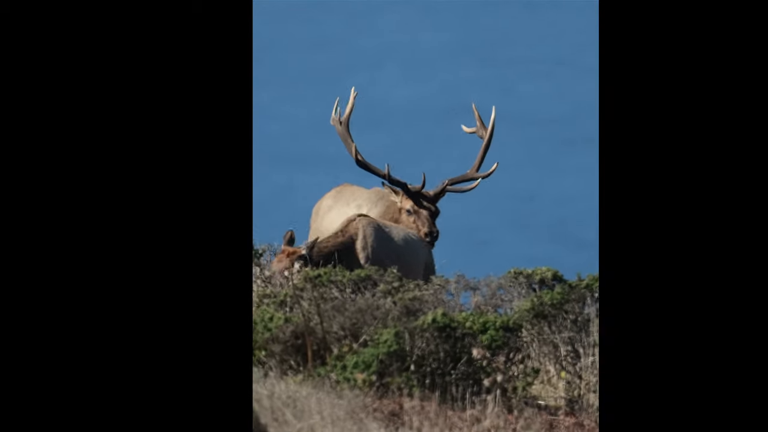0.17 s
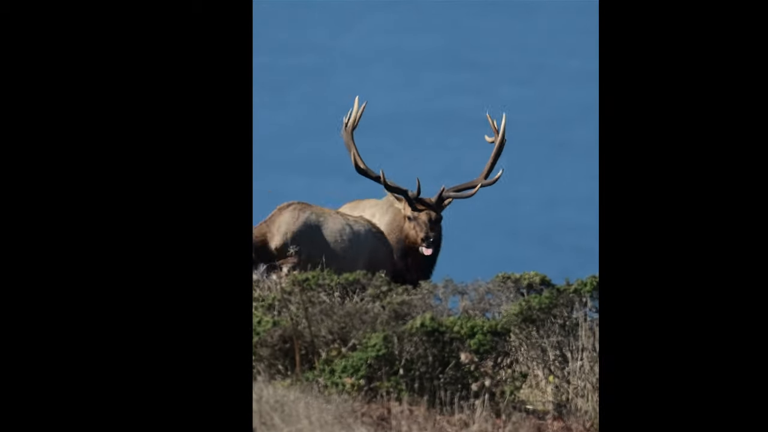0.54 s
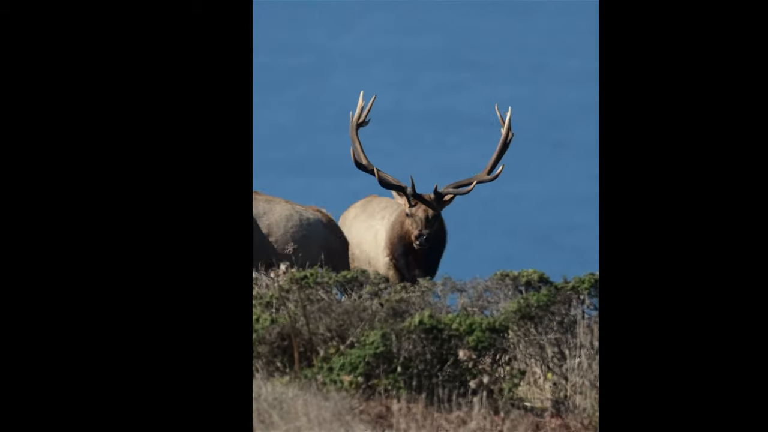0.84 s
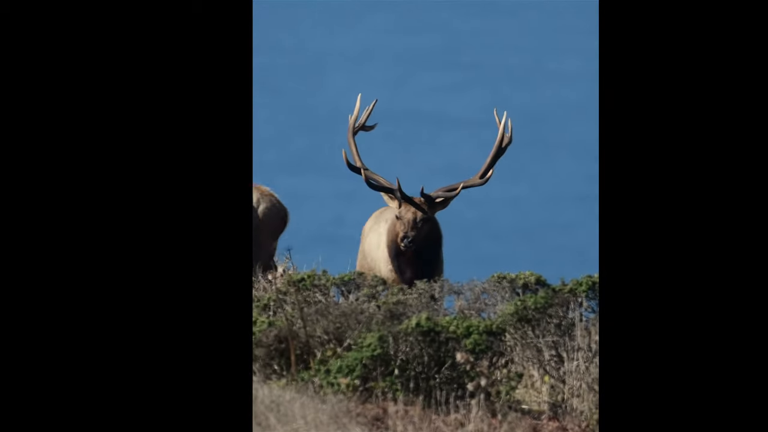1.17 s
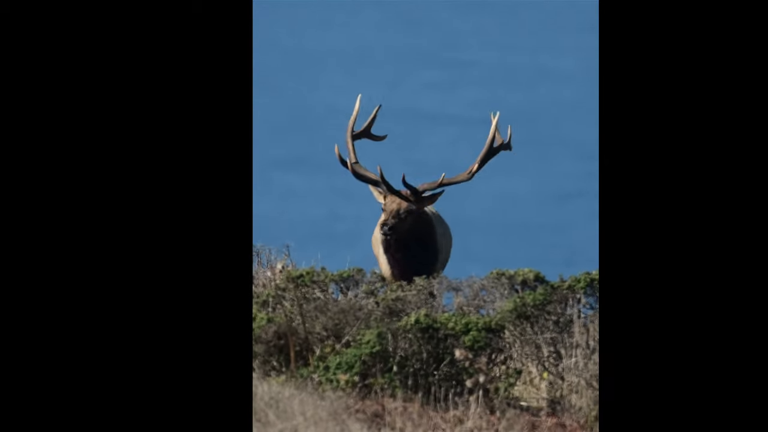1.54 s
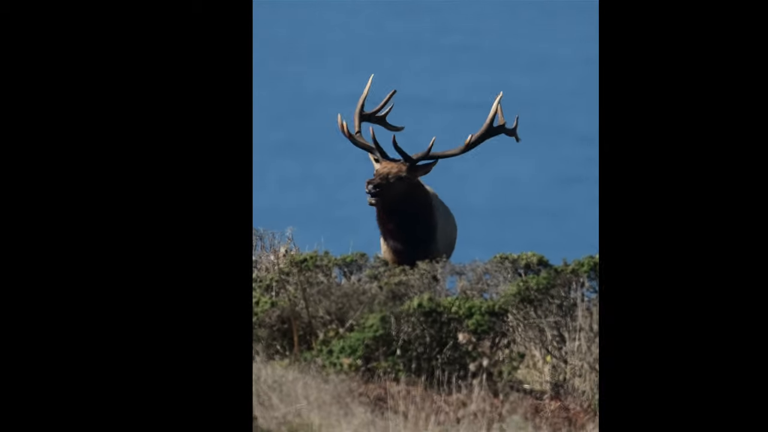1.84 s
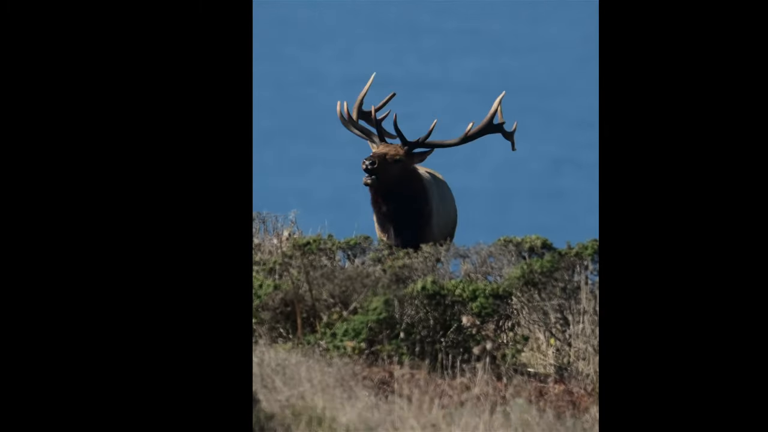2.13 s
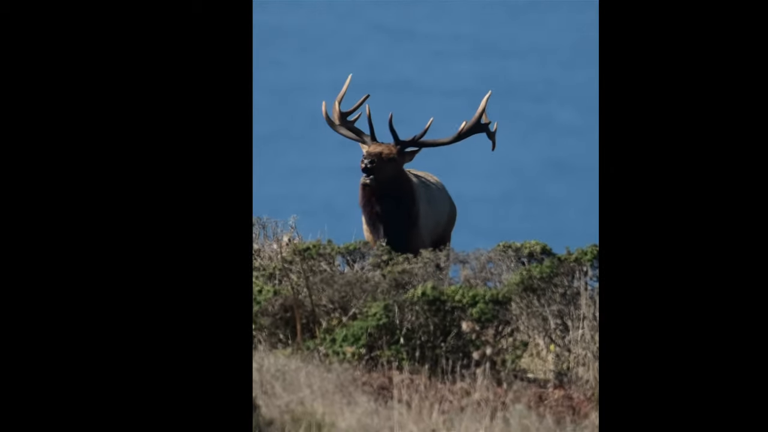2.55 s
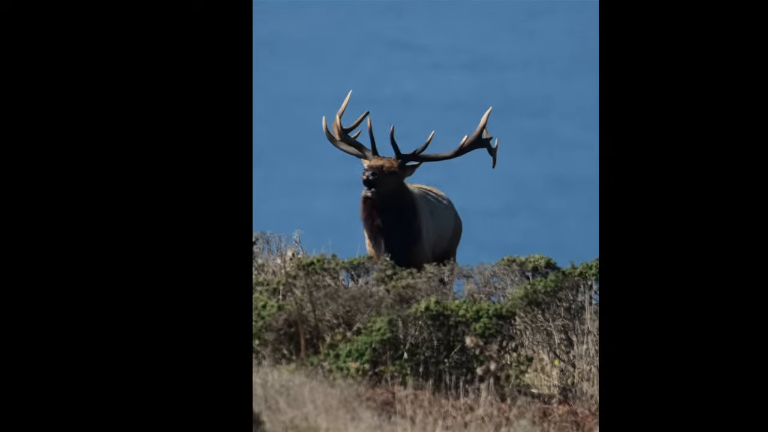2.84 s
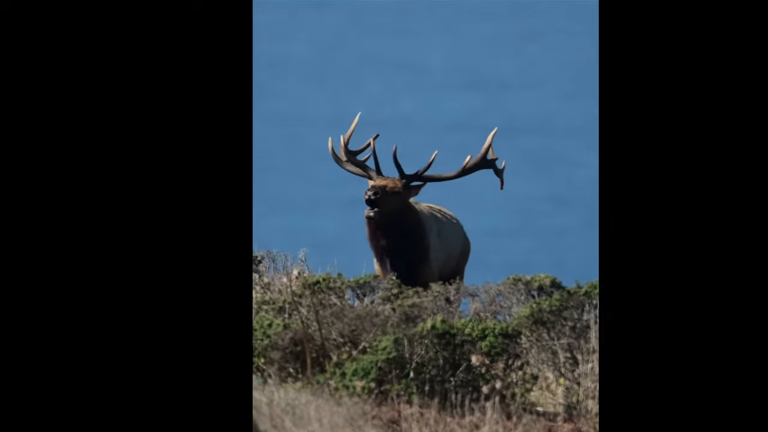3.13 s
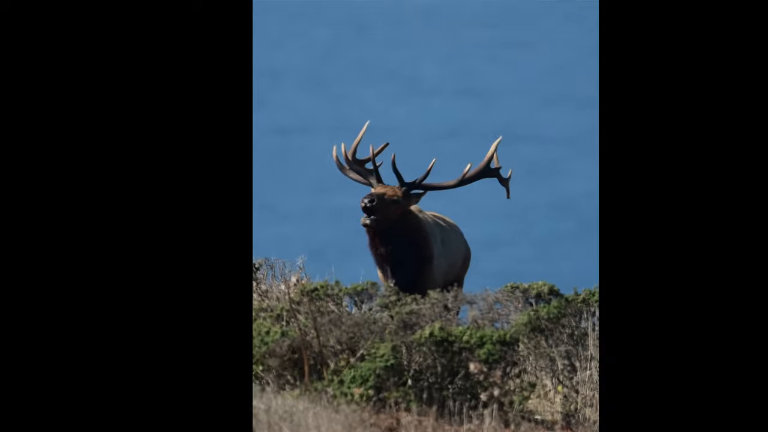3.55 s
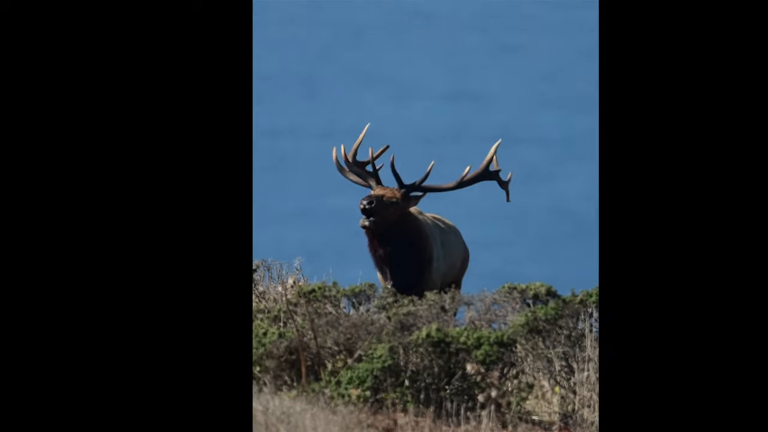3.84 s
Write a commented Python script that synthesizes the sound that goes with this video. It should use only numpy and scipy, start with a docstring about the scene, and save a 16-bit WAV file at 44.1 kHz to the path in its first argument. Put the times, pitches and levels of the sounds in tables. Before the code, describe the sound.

Steady wind and far surf fill an open coast, with light thumps on the microphone, two faint clicks and thin bird chirps. Then an elk gives a loud bugle that rises quickly and holds a shrill, rasping whistle.

```python
"""Wind and far surf rush over coastal scrub, with faint hums and the hiss of a camera's electronics.
In the first second gusts thump the microphone and a small bird chips. Then the camera ticks twice.
After two seconds the gusts and chips return. Near 2.7 s a bull elk bugles: its whistle climbs in steps,
then holds from 3.1 s to the end while the vocal folds buzz under it and split each harmonic into
sidebands (extra tones just above and below it)."""
import sys
import numpy as np
from scipy import signal
from scipy.fft import rfft, irfft, next_fast_len
from scipy.io import wavfile
from scipy.ndimage import uniform_filter1d, map_coordinates

SR = 44100
rng = np.random.default_rng(int(sys.argv[2]) if len(sys.argv) > 2 else 0)


def pcm_store(signal):
    """Save signal as 16-bit PCM."""
    levels = np.round(np.clip(np.atleast_2d(signal), -1, 1) * 32767)
    wavfile.write(sys.argv[1], SR, levels.astype(np.int16).T)


N = 176400
TIME_S = np.arange(N) / SR

# Tone colour of the wind and surf: pitch_hz, gain_db
RUSH_COLOUR = [(15, -46), (25, -19), (49, -4), (169, -6), (272, -4.5), (305, -11), (541, -9.5),
               (595, -13.5), (1020, -12.5), (1490, -23.5), (1910, -24.5), (2400, -30.5), (3120, -82)]
# How much of the rush differs between the ears, against what they share: pitch_hz, width_db
RUSH_WIDTH = [(200, -44.5), (380, -18.5), (700, -11.5), (1290, 0.5), (2400, 10)]
# Rise and fall of the gusts on the microphone: time_s, relative_level_db
GUST_LEVELS = [(0, -53.5), (.3, -50), (.7, -59), (.85, -52), (1.3, -67.5), (2.2, -58.5), (2.35, -47.5),
               (2.5, -56), (2.66, -48), (2.8, -54), (3.4, -57), (3.55, -84)]
# Tone colour of the gusts: pitch_hz, gain_db
GUST_COLOUR = [(30, -6), (60, -7), (120, -1.5), (200, -12), (320, -13), (500, -62)]
# Steady hums: pitch_hz, width_hz, level_db
HUM_TONES = [(1899.6, 63.4, -75.5), (181.6, 4.1, -66.5), (490.3, 17, -73), (569.6, 110, -66)]
# Tone colour of the electronic hiss: pitch_hz, gain_db
HISS_COLOUR = [(1500, -26), (2800, -1), (4000, 1.5), (6200, -0.5), (7200, -3.5), (9000, -3.5), (15700, -9)]
# Single thumps of wind: start_s, relative_level_db, pitch_hz
WIND_THUMPS = [(0.184, -38, 93), (0.207, -40, 114), (0.239, -37, 126), (0.628, -39, 117),
               (0.839, -41.5, 100), (0.428, -29, 170), (0.808, -33, 99), (0.995, -40, 148),
               (2.315, -32.5, 93), (2.392, -33, 117.8), (2.59, -35, 162.6), (2.669, -37, 81.6),
               (3.099, -40, 94.2)]
# Bird chips: start_s, length_s, start_pitch_hz, end_pitch_hz, level_db, left_over_right_db
BIRD_CHIPS = [(2.24, 0.06, 9700, 7560, -58, -17), (2.7, 0.06, 10600, 8750, -65.5, -4),
              (2.1, .045, 8800, 7700, -72, -10), (2.51, 0.034, 8400, 7990, -66, 3),
              (0.476, 0.042, 7100, 6340, -66.5, -12)]
# Camera ticks: start_s, relative_level_db, ring_hz, treble_limit_hz
CAMERA_TICKS = [(1.2575, -43, 1900, 8000), (1.7912, -45, 4000, 4500)]
# The elk's hoarse breath: time_s, level_db
BREATH_LEVELS = [(2.6, -100), (2.78, -74), (2.9, -68), (2.96, -59), (3.03, -66), (3.12, -76)]
# Bands where the throat boosts the breath: pitch_hz, width_hz, gain_db
THROAT_BANDS = [(3750, 260, 5), (5800, 1400, -15)]
# The climbing whistle: time_s, pitch_hz, then level_db for each of harmonics 1 to 4
WHISTLE_CLIMB = [(2.73, 749, -59.5, -68, -63, -85), (2.775, 775, -55.5, -82, -79, -87),
                 (2.803, 795, -77, -74, -80, -85), (2.808, 1025, -54.5, -61, -83.5, -86),
                 (2.85, 1077, -48.5, -70, -71.5, -69), (2.882, 1073, -48, -60, -74, -60.5),
                 (2.888, 1136, -48, -69, -72, -69), (2.918, 1202, -48.5, -65, -57, -77),
                 (2.928, 1453, -46.5, -67.5, -53, -68), (2.95, 1473, -46.5, -65, -55, -64),
                 (2.972, 1467, -45.5, -82, -58, -63), (2.978, 1625, -52.5, -68, -58, -56),
                 (2.995, 1710, -44, -75, -56, -57.5), (3.008, 1720, -43.5, -61, -59.5, -55),
                 (3.019, 1846, -50, -38.5, -54.5, -57), (3.035, 1910, -55, -39.5, -60, -82),
                 (3.055, 1990, -47, -35.5, -65, -90), (3.075, 2020, -54, -36, -50.5, -62),
                 (3.1, 2077, -47.5, -40.5, -39.5, -60), (3.108, 2112, -38.5, -35.5, -43.5, -83)]
# Roughness of the voice: time_s, roughness (0 to 1)
VOICE_ROUGHNESS = [(2.99, .2), (3.05, .07), (3.25, .08), (3.45, .2), (3.62, .15), (3.632, .36), (3.728, .3),
                   (3.74, .1)]
# The held whistle: time_s, pitch_hz, folds_hz, then level_db, centre, spread for harmonics 1 to 3.
# Centre and spread count sidebands and say which are strong. Harmonic 1 has its centre in the next table.
WHISTLE_HOLD = [(3.125, 2250, 273.3, -52.5, 1.05, -40, 0.1, 0.6, -46, 0.79, 1.21),
                (3.15, 2277, 260, -52, 0.95, -49, -0.64, 1.1, -39, 0, 0.78),
                (3.2, 2296, 239.6, -46, 0.95, -56, -0.25, 1.18, -33.5, -0.36, 0.66),
                (3.26, 2286, 239.5, -40.5, 0.848, -57, 1.06, 2.6, -39.5, -0.4, 1.04),
                (3.3, 2290, 225.4, -41.5, 1.03, -50, -0.1, 1.3, -44.5, -1.05, 0.82),
                (3.34, 2287, 225, -42, 1.22, -52, 1.4, 3.1, -59, -2.53, 2.6),
                (3.4, 2291, 212.5, -39, 1.246, -56.5, 1, 3, -51.5, 0.49, 2.9),
                (3.53, 2313, 203, -41.5, 1.44, -61, 1, 3.4, -53, -1.9, 2.3),
                (3.61, 2304, 211.2, -40.5, 1.353, -55.5, 1.3, 3.53, -50, -1.9, 2.8),
                (3.64, 2328, 210.7, -42.5, 1.4, -59.5, 1.5, 4.4, -53.5, -0.36, 3.1),
                (3.72, 2331, 208, -41.5, 1.3, -60, 2.7, 4.5, -51.5, -1, 2.4),
                (3.75, 2307, 202.6, -37.5, 1.304, -62, 1, 3.55, -50.5, 0.12, 2.8),
                (3.82, 2294, 203.7, -37.5, 1.29, -53, 0.5, 2.39, -44.5, 0.027, 1.86),
                (3.9, 2299, 200.4, -39, 1.3, -50.5, 0.8, 2.35, -46.5, -0.5, 1.6),
                (3.975, 2300, 200.7, -41.5, 1.27, -52, 0.29, 2.3, -48, -0.67, 1.35)]
# Centre of the sidebands around harmonic 1: time_s, centre (in sidebands)
FIRST_HARMONIC_CENTRE = [(3.15, 0.16), (3.36, -.3)]
# Steady colour of the hold, one row for each of harmonics 1 to 3: gain_db for sidebands -4 to 4
SIDEBAND_GAINS = [
    [5, 20, -15, 5.1, -1, 3.2, 5, -17, -40],
    [1.6, 5, 6.5, 3.2, -5.5, 3.6, -1, -1, 2.5],
    [2.2, 0.5, 2, 0.87, 1.5, 0.91, -7, -27, -45],
]
# Faint fourth harmonic of the hold: time_s, level_db
FOURTH_HARMONIC = [(3.13, -77), (3.16, -63), (3.22, -61.5), (3.33, -78.5)]
# The elk in the left ear against the right: pitch_hz, left_over_right_db, left_lead_rad
ELK_DIRECTION = [(1070, -3.5, 0), (1470, -9, 0), (2100, -12.5, .65), (2300, -6.5, .68), (2500, -4.7, .5),
                 (4400, -11, 0), (4800, -6, -.15), (6900, -8.5, .1)]
# Bands that the camera housing cancels: pitch_hz, width_hz
HOUSING_DIPS = [(2620, 286), (7750, 1080)]

LEAN_HZ = 2208  # the rush and hums lean right with pitch; their lean_db applies at this pitch
CALL_START = int(2.6 * SR)  # the elk's tones are silent before this sample


def amp(db):
    """Turn decibels into a gain."""
    return 10 ** (np.asarray(db) / 20)


def unit(x):
    """Scale a sound to an average power of 1."""
    return x / np.sqrt(np.mean(x ** 2) + 1e-20)


def along(points, hz):
    """Read between (pitch_hz, value) points on a log pitch scale."""
    pitches, values = np.transpose(points)
    return np.interp(np.log(hz + 1), np.log(pitches + 1), values)


def curves(rows):
    """One value per sample for each column after the time."""
    times, *columns = np.transpose(rows)
    return [np.interp(TIME_S, times, column) for column in columns]


def wobble(rate_hz, size=N):
    """A smooth random curve through rate_hz points a second."""
    points = rng.standard_normal(int(size * rate_hz / SR) + 4)
    return map_coordinates(points, [np.arange(size) * rate_hz / SR])


def filtered(x, response):
    """Give each frequency f in x the gain response(f)."""
    size = next_fast_len(N + SR // 2)
    return irfft(rfft(x, size) * response(np.fft.rfftfreq(size, 1 / SR)), size)[..., :N]


def colour(points):
    """A filter that follows (pitch_hz, gain_db) points and is silent outside them."""
    return lambda f: amp(along(points, f)) * (f > points[0][0]) * (f < points[-1][0])


def band(f, hz, width_hz):
    """A soft hill of gain around hz."""
    return 1 / (1 + ((f - hz) / width_hz * 2) ** 2)


def resonance(f, hz, width_hz):
    """A filter that rings at hz, for longer the narrower it is."""
    return 1j * f * width_hz / (hz ** 2 - f ** 2 + 1j * f * width_hz)


def panned(left_over_right_db):
    """Left and right gains, as two rows."""
    return amp(np.vstack([left_over_right_db, -left_over_right_db]) / 2)


def phase_of(hz):
    """The running phase of a changing pitch, in radians."""
    return 2 * np.pi * np.cumsum(hz) / SR


def fade(inside_s, length_s):
    """A gain of 1 where inside_s is positive, sloping to 0 over length_s outside."""
    return np.clip(inside_s / length_s + 1, 0, 1)


def wind_and_surf(level_db=-55, patch_db=0.92, lean_db=-6):
    """Wind and far surf make a patchy rush of noise, wider in the treble."""
    spectrum = signal.stft(rng.standard_normal((2, N)), nperseg=512)[2]
    patches = uniform_filter1d(rng.standard_normal(spectrum.shape[1:]), size=4, axis=0)
    patches = uniform_filter1d(patches, size=10, axis=1)  # now smooth in both pitch and time
    shared, side = signal.istft(spectrum * amp(patch_db * unit(patches)), nperseg=512)[1][:, :N]
    shared = filtered(shared, colour(RUSH_COLOUR))
    side = filtered(side, lambda f: colour(RUSH_COLOUR)(f) * amp(along(RUSH_WIDTH, f)))
    ears = np.array([shared + side, shared - side]) / np.std(shared)
    rush = filtered(ears, lambda f: panned(lean_db * np.minimum(f / LEAN_HZ, 1) ** 2))
    return amp(level_db + 1.04 * wobble(1.94)) * rush


def gusts(trim_db=-2):
    """Gusts buffet the microphone with a lumpy rumble."""
    lumps = amp(2.5 * wobble(20)) * filtered(rng.standard_normal(N), colour(GUST_COLOUR))
    return amp(curves(GUST_LEVELS)[0] + trim_db) * unit(lumps)


def hums(drone_hz=62, waver_hz=5, drone_db=-58, lean_db=-28):
    """A low wavering drone under fuzzy steady tones, the higher the further right."""
    out = amp(drone_db + 1.5 * wobble(5)) * np.sin(phase_of(drone_hz + waver_hz * wobble(12)))
    for hz, width_hz, db in HUM_TONES:
        hum = unit(filtered(rng.standard_normal(N), lambda f: band(f, hz, width_hz)))
        out = out + amp(db) * panned(lean_db * (hz / LEAN_HZ) ** 2) * hum
    return out


def hiss(level_db=-66):
    """The camera's electronics add separate noise to each channel."""
    return amp(level_db) * unit(filtered(rng.standard_normal((2, N)), colour(HISS_COLOUR)))


def thumps(trim_db=-4, width_cycles=0.75, peak_delay_s=0.01237):
    """Each knock of wind on the microphone is a low pulse, only a cycle or two long."""
    out = np.zeros(N)
    for start_s, db, hz in WIND_THUMPS:
        cycles = (TIME_S - start_s - peak_delay_s) * hz
        swell = np.exp(-(cycles / width_cycles) ** 2)
        out += amp(db + trim_db) * swell * np.cos(2 * np.pi * cycles + 3.3)
    return out


def birds(bend=3.4):
    """Small birds give thin chips whose pitch falls fast and levels off."""
    out = np.zeros((2, N))
    for start_s, length_s, start_hz, end_hz, db, pan_db in BIRD_CHIPS:
        start, size = int(start_s * SR), int(length_s * SR)
        progress = np.arange(size) / (length_s * SR)
        hz = end_hz + (start_hz - end_hz) * (1 - progress) ** bend
        swell = np.sin(np.pi * progress) ** 1.2
        tone = np.sin(phase_of(hz) + .9 * wobble(240, size))
        out[:, start:start + size] += amp(db) * panned(pan_db) * swell * tone
    return out


def ticks(fade_s=.02, bounce_s=.007, bounce_db=-14, ring_gain=2.5):
    """The camera ticks: each dry burst of noise bounces once and rings briefly."""
    out = np.zeros((2, N))
    decay = lambda s: (TIME_S >= s) * amp(-60 * np.abs(TIME_S - s) / fade_s)
    for start_s, db, ring_hz, top_hz in CAMERA_TICKS:
        hits = decay(start_s) + amp(bounce_db) * decay(start_s + bounce_s)
        burst = amp(db) * hits * rng.standard_normal((2, N))
        cut_bass = lambda f: 1j * f / ring_hz * resonance(f, ring_hz, ring_hz)
        cut_treble = lambda f: 1 / (1 + 1j * f / top_hz) ** 2
        ring = lambda f: ring_gain * resonance(f, ring_hz, .2 * ring_hz)
        out += filtered(burst, lambda f: ring(f) + cut_bass(f) * cut_treble(f))
    return out


def elk_breath():
    """Hoarse, fluttering air passes through the elk's throat."""
    throat = lambda f: sum(amp(db) * band(f, hz, width_hz) for hz, width_hz, db in THROAT_BANDS)
    level_db = curves(BREATH_LEVELS)[0] + 5.8 * wobble(40)
    return amp(level_db) * unit(filtered(rng.standard_normal(N), throat))


def elk_tone(level_db, phase, roughness, fuzz, rough_hz=130, breath_hz=467):
    """One tone of the voice: more fuzz gives it more shimmer, roughness and breath."""
    level_db, phase = level_db[CALL_START:], phase[CALL_START:]
    roughness = fuzz * roughness[CALL_START:]
    flutter = lambda hz: wobble(hz, N - CALL_START)
    rasp = np.minimum(roughness, 1) * flutter(rough_hz)
    breath = fuzz * amp(-21) * flutter(breath_hz)
    drift = rng.uniform(0, 2 * np.pi) + roughness * flutter(rough_hz)
    shimmer_db = fuzz * .9 * flutter(16.31)
    tone = np.sqrt(2) * amp(level_db + shimmer_db) * (1 + rasp + breath) * np.sin(phase + drift)
    return np.pad(tone, (CALL_START, 0))


def elk_climb(roughness, ring_hz=1470, ring_width_hz=13, ring_gain=1.8):
    """The whistle steps up through a sharp throat resonance and thins whenever its pitch jumps."""
    hz, *levels_db = curves(WHISTLE_CLIMB)
    jump_speed = np.abs(np.gradient(np.log(hz))) * SR
    thinning_db = .55 * uniform_filter1d(jump_speed, size=150)
    whistle = sum(elk_tone(db - thinning_db, (k + 1) * phase_of(hz), roughness, fuzz=.5 + k)
                  for k, db in enumerate(levels_db))
    whistle *= fade(TIME_S - WHISTLE_CLIMB[0][0], length_s=.0166)
    whistle *= fade(WHISTLE_CLIMB[-1][0] - TIME_S, length_s=.01)
    return filtered(whistle, lambda f: 1 + ring_gain * resonance(f, ring_hz, ring_width_hz))


def elk_hold(roughness, stutter_hz=56, stutter_align_s=3.637):
    """Buzzing vocal folds split the held whistle into sidebands, spaced by the pitch of the folds."""
    whistle_hz, folds_hz, *shapes = curves(WHISTLE_HOLD)
    shapes.insert(1, curves(FIRST_HARMONIC_CENTRE)[0])
    whistle, folds = phase_of(whistle_hz), phase_of(folds_hz)
    # Rough folds falter in beats, and the lower sidebands dip.
    beats = 1 + np.cos(2 * np.pi * stutter_hz * (TIME_S - stutter_align_s) + wobble(24.5))
    stutter_db = 45 * roughness ** 2 * beats
    out = elk_tone(curves(FOURTH_HARMONIC)[0], 4 * whistle, roughness, fuzz=2)
    for k, gains_db in enumerate(SIDEBAND_GAINS):
        db, centre, spread = shapes[3 * k:3 * k + 3]
        for sideband, gain_db in zip(range(-4, 5), gains_db):
            fall_db = 10 * ((sideband - centre) / np.maximum(spread, .5)) ** 2
            level_db = db + gain_db - fall_db - stutter_db * (sideband < 0)
            phase = (k + 1) * whistle + sideband * folds
            out += elk_tone(level_db, phase, roughness, fuzz=.15 + .35 * (k + abs(sideband)))
    return fade(TIME_S - WHISTLE_HOLD[0][0], length_s=.023) * out


def echo(call, gain_db=-14, fade_s=.2, top_hz=3000):
    """A short, dull echo that drops 60 dB in fade_s."""
    tail = rng.standard_normal((2, SR // 2)) * amp(-60 * TIME_S[:SR // 2] / fade_s)
    smeared = signal.fftconvolve(call[None], tail / np.linalg.norm(tail[0]), axes=1)[:, :N]
    return amp(gain_db) * filtered(smeared, lambda f: 1 / (1 + 1j * f / top_hz))


def elk():
    """The whole bugle and its echo, louder in the right ear."""
    roughness = curves(VOICE_ROUGHNESS)[0]
    call = elk_breath() + elk_climb(roughness) + elk_hold(roughness)
    direction = np.array(ELK_DIRECTION)
    left_db, left_lead = direction[:, [0, 1]], direction[:, [0, 2]]
    left = lambda f: amp(along(left_db, f)) * np.exp(1j * along(left_lead, f))
    return filtered(call + echo(call), lambda f: np.array([left(f), np.ones_like(f)]))


def scene():
    """Add up all the sounds in stereo."""
    return wind_and_surf() + gusts() + hums() + hiss() + thumps() + birds() + ticks() + elk()


def record(dry, top_hz=15750):
    """The camera housing cancels two bands, and everything above top_hz is cut."""
    dip = lambda f, hz, width_hz: np.abs(f - hz) / np.hypot(f - hz, width_hz / 2)
    housing = lambda f: np.prod([dip(f, *row) for row in HOUSING_DIPS], axis=0)
    return filtered(dry, lambda f: housing(f) * (f < top_hz))


dry = scene()
out = record(dry)
pcm_store(out)
```